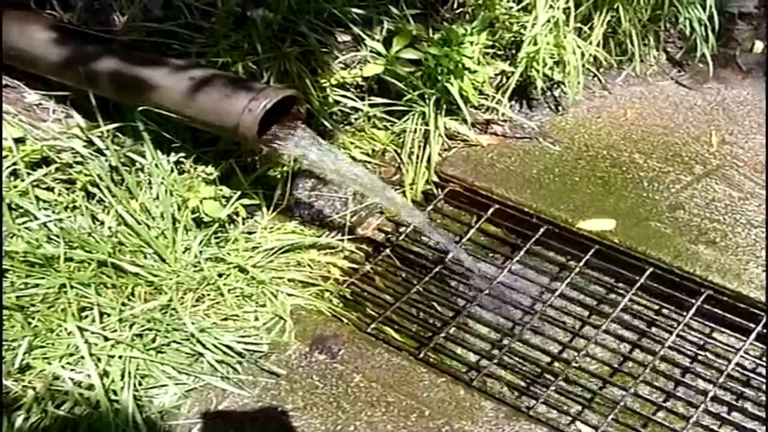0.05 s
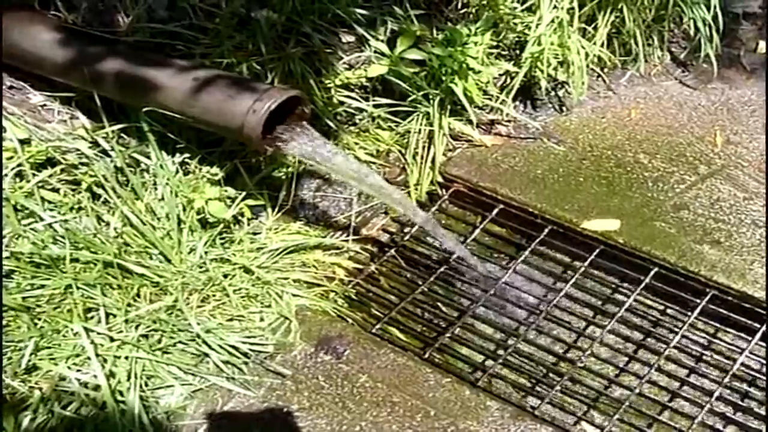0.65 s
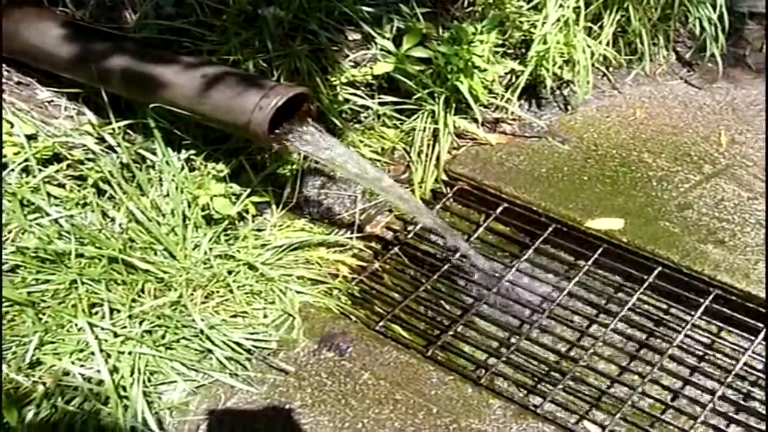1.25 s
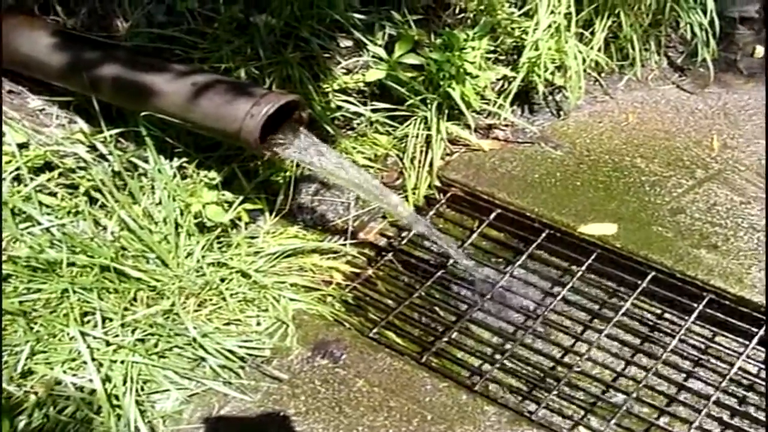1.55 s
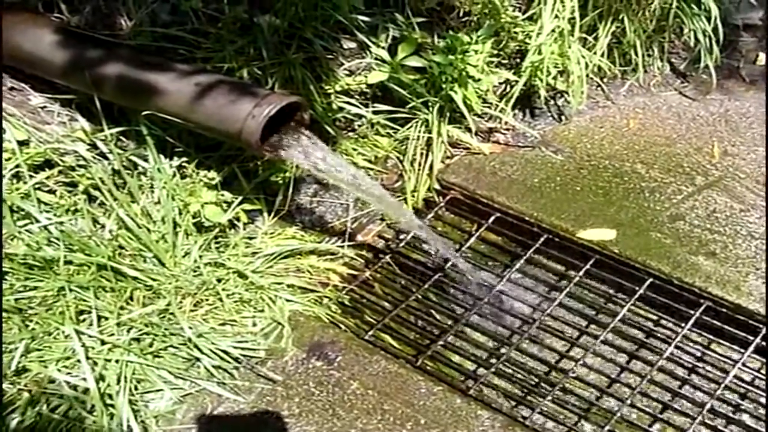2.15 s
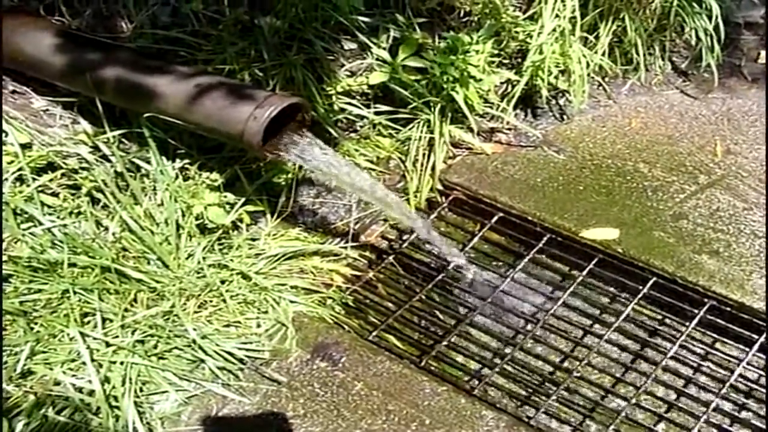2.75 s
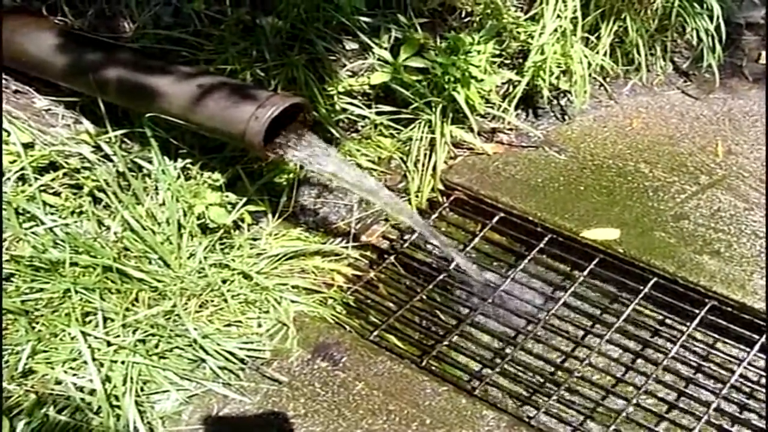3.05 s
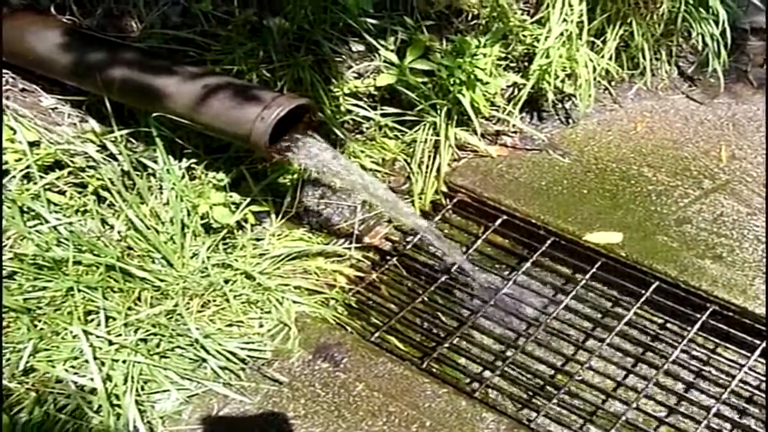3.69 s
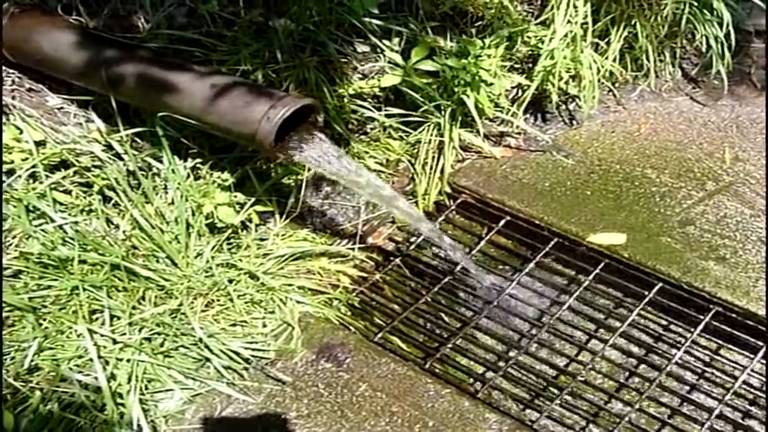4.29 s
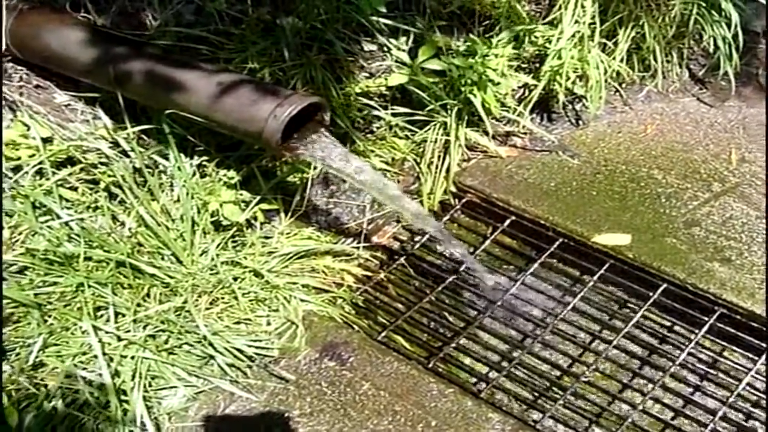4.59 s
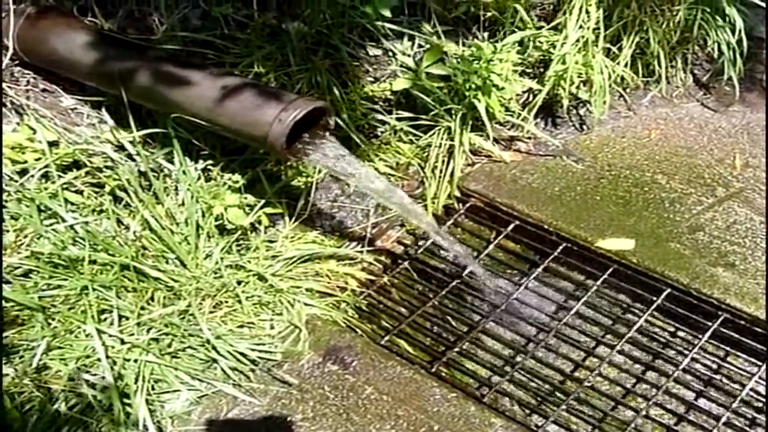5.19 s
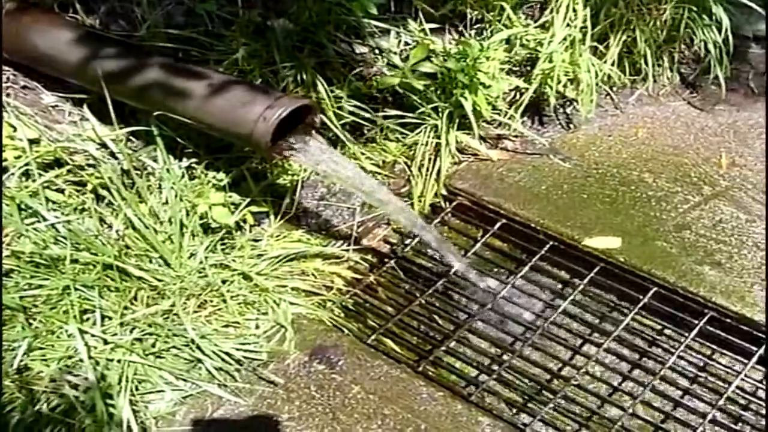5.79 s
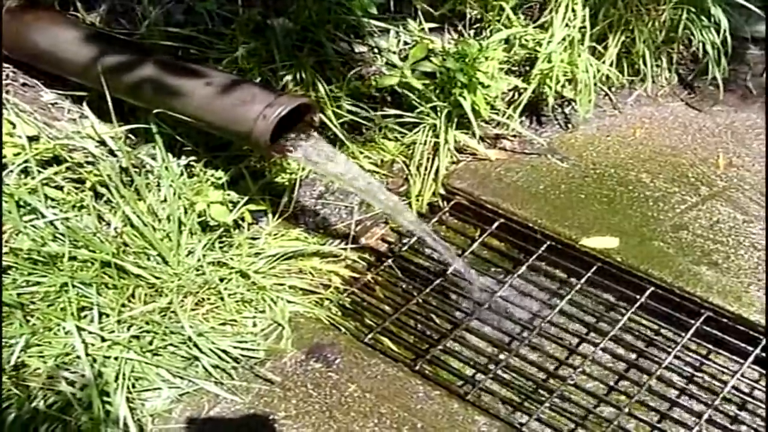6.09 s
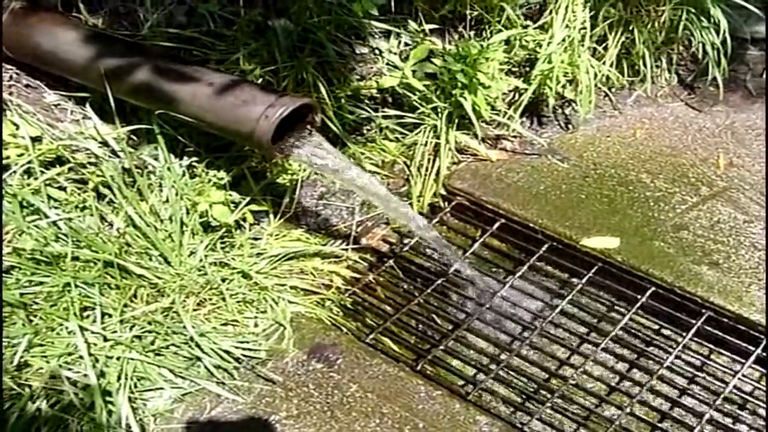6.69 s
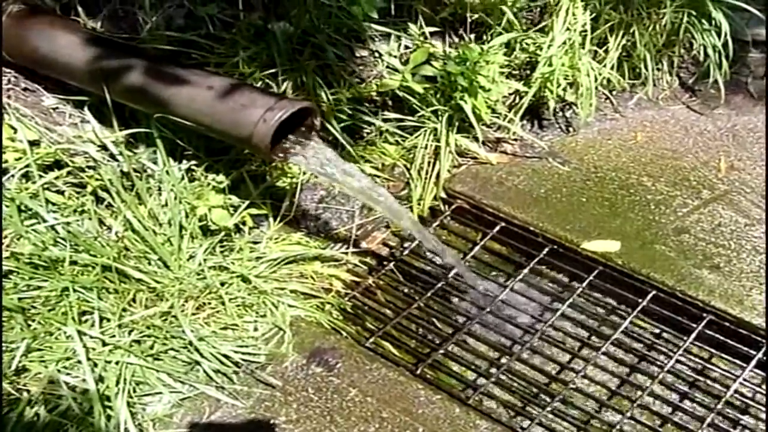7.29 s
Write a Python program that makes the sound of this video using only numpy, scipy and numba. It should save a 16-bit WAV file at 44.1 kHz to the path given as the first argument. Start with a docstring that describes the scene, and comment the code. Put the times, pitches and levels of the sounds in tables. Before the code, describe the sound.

Close up, a jet of water splashes steadily on a steel grate over a concrete drain, hissing and spattering, with fat drops ticking on the bars and light bubbling underneath. The water fills the foreground throughout in the open air. A distant car passes softly during the first half, a faint low hum and traffic rumble stay underneath, and a far engine drones quietly towards the end.

```python
"""At a steel grate over a concrete drain channel, a stereo pair close to where spring water lands.
The jet gushes from its pipe in surges: fine spray hisses, fat drops slap the bars, and bubbles of
trapped air ring in the channel below. On a distant road a car rolls by and its tyre roar fades;
a low hum stays over the traffic rumble, and a far engine drones towards the end."""
import sys
import numpy as np
from scipy import signal
from scipy.fft import rfft, irfft
from scipy.io import wavfile
from scipy.ndimage import uniform_filter1d
from numba import njit

SR = 44100
rng = np.random.default_rng(int(sys.argv[2]) if len(sys.argv) > 2 else 0)


def dump_mix(stems):
    """Bounce the given channels to the path in sys.argv[1] as a 16-bit WAV at rate SR."""
    frames = np.atleast_2d(stems).T  # one column per channel
    limited = np.clip(frames, -1, 1)  # hard clip at full scale
    pcm = np.round(limited * 32767).astype(np.int16)
    wavfile.write(sys.argv[1], SR, pcm)


N = 328104
TIME = np.arange(N) / SR
FREQS = np.fft.rfftfreq(N, 1 / SR) + 1e-3

# Levels in the tables are relative; each source sets its own gain.
# light air on the microphones: f/Hz, level/dB
BREEZE_COLOUR = [(20, -5), (50, 0), (90, -6), (200, -24), (800, -60)]
# far traffic: f/Hz, level/dB
TRAFFIC_COLOUR = [(20, -9), (38, -3), (55, -3), (65, -1.5), (85, -0.5), (130, 1), (250, 2.5), (400, -13),
                  (1000, -9), (2500, -52)]
# low hum in the distance: t/s, level/dB
HUM_LEVEL = [(0, -50.5), (.7, -44.5), (1.1, -47), (1.8, -42), (3, -43.5), (4.6, -51), (5.6, -44),
             (6.6, -48.5), (7.44, -49.5)]
# far engine: t/s, level/dB
ENGINE_LEVEL = [(0, -62), (3, -53.5), (4.4, -51), (5.6, -55.5), (6.6, -46), (7.44, -47.5)]
# tyres of the passing car: t/s, level/dB, centre f/Hz
TYRE_PASS = [(0, -32, 1150), (.7, -31, 1200), (1.3, -30.8, 1240), (1.8, -30.5, 1330), (2.3, -31.5, 1370),
             (2.8, -34.5, 1310), (3.3, -39.5, 1180), (3.8, -45.5, 1130), (4.5, -56.5, 1070),
             (7.44, -58, 1080)]
# low roar of the road: t/s, level/dB
ROAD_LEVEL = [(0, -38), (2, -40), (3.8, -41), (5, -44), (7.44, -47.5)]
# colour of that roar: f/Hz, level/dB
ROAD_COLOUR = [(60, -16), (150, -10), (240, -6), (285, 4), (330, .5), (500, -2), (700, -5.5),
               (900, -8), (2500, -23.5)]
# reflections in the channel: f/Hz, level/dB
CHANNEL_COLOUR = [(500, 6.5), (1700, 5), (2700, -8), (3400, 2), (4800, 3), (5600, -1), (6500, 4.5),
                  (9000, 4.5), (11500, 7.5), (15000, 7.5)]
# single bubbles under the grate: t/s, level/dB, f/Hz, ring length/cycles to 60 dB down
BIG_BUBBLES = [(.452, -17, 2780, 48), (.461, -15, 4130, 62), (.585, -17, 650, 10), (.614, -15, 2200, 15),
               (1.812, -15, 2840, 40), (2.184, -18, 2900, 45), (2.207, -15, 2730, 50),
               (3.057, -16.5, 2710, 47), (3.271, -15, 2500, 43), (3.416, -30, 287, 35),
               (3.617, -15, 2680, 49), (3.735, -30, 300, 20), (3.738, -25, 470, 15), (3.764, -31, 225, 29),
               (3.778, -30, 400, 39), (3.922, -18, 2860, 45), (4.055, -16, 2900, 45),
               (4.098, -16, 2840, 38), (4.333, -23.5, 1420, 44), (4.537, -14.5, 2780, 35),
               (4.57, -15, 2510, 31), (4.948, -27, 660, 16), (5.129, -14, 2750, 53), (5.788, -23, 620, 14),
               (6.262, -16, 2780, 70), (6.333, -17, 1600, 12), (6.772, -17, 2720, 51),
               (7.028, -25, 2020, 42), (7.252, -12, 2800, 58)]
# small bubbles, tiny bubbles, splatter and fine spray: f/Hz, level/dB
FIZZ_COLOUR = [(1000, -12), (2000, -6.5), (2850, 1), (3200, -1), (4500, -10)]
PING_COLOUR = [(3000, -2.5), (4700, 0), (5500, 3), (6300, -6.5), (7600, -1.5), (11000, -4)]
SPLATTER_COLOUR = [(1000, -21), (2000, -4.5), (3000, -1.5), (5200, 2), (6300, -2.5), (7700, -.5),
                   (11000, -8.5), (16000, -15)]
SPRAY_COLOUR = [(300, -9), (900, -12), (1700, -13), (2400, -7.5), (3500, -4), (4800, -1), (5600, 1),
                (6200, 0), (7600, 0.5), (8900, -0.5), (9700, 1), (11800, -2), (13400, -1), (15800, -5.5)]
# fat drops on the bars: t/s, level/dB, f/Hz
FAT_DROPS = [(0.1744, -7, 5470), (0.4285, -3, 4770), (.527, -2, 10100), (0.586, -5, 5900), (.616, -3, 6300),
             (.8306, -5, 6000), (0.8925, -1.5, 5940), (.958, -7, 6700), (0.9673, -6, 5800),
             (1.008, -6, 5400), (1.065, -7, 7700), (1.0995, -5, 5100), (1.2819, -5, 6650),
             (1.803, -3, 6700), (1.9624, -3, 9300), (2.1227, -10, 5600), (2.1862, -11, 3580),
             (2.5598, -5, 7400), (2.665, 0, 6600), (2.8022, -2, 8700), (3.127, -11, 4600),
             (3.3484, -3, 10200), (3.507, -6, 5300), (3.5544, -9, 5300), (3.571, -4, 5400),
             (3.7109, -8, 5000), (3.75, -3, 6330), (3.8689, -3, 6500), (3.949, -2.5, 5000),
             (3.9844, -5, 8000), (4.055, -10.5, 3500), (4.1515, 1.5, 7600), (4.2004, -3, 8700),
             (4.401, -8, 4580), (4.498, -5, 5500), (4.599, -1.5, 4520), (4.7357, -7, 7800),
             (4.7715, -4, 4320), (5.062, -6, 11000), (5.0673, -1, 8500), (5.124, -7, 5160),
             (5.418, -3, 6670), (5.5602, -1, 6400), (5.6348, -2, 9300), (5.651, -6, 6000),
             (5.7928, -3.5, 5240), (5.8434, -10, 6400), (5.953, -11, 6500), (6.1007, -2.5, 5340),
             (6.287, -6, 7100), (6.331, 4, 12800), (6.456, 1, 5560), (6.5028, -5, 7400), (6.561, -7, 4650),
             (6.7302, -2.5, 4360), (6.7431, -7, 4900), (6.827, -4.5, 5300), (6.8465, -6, 5300),
             (6.919, -8, 6100), (7.058, -11, 5100), (7.176, -4, 5670), (7.2534, -12, 3000),
             (7.3132, -7, 8400)]
# the stream builds up, then holds: t/s, level/dB
STREAM_FLOW = [(0, -3.5), (.3, -2), (.5, .2), (1.3, 0.7), (2.2, 0.3), (3, -0.9), (3.7, 0), (4.4, -0.5),
               (5.2, .5), (5.9, -1), (7.44, -0.6)]
# thick lumps of water landing on the grate: t/s, length/s, splash level/dB, bubbling level/dB
HEAVY_GUSHES = [(0.449, 0.045, -28, -33), (0.547, 0.042, -28, -41), (0.955, 0.053, -23, -38),
                (1.474, 0.033, -22, -43), (1.795, 0.029, -22, -32), (1.861, 0.081, -23.5, -27.5),
                (2.068, 0.051, -24, -42), (2.176, 0.032, -29, -31), (2.278, 0.08, -26, -33),
                (2.746, 0.044, -23, -32), (2.955, 0.041, -23, -40), (3.546, 0.035, -22, -43),
                (3.979, 0.056, -24, -39), (4.09, 0.044, -19, -32), (4.142, 0.037, -20, -42),
                (4.374, 0.057, -25, -35), (4.561, 0.044, -25, -30), (4.687, 0.03, -18.5, -39),
                (4.729, 0.051, -25, -34), (5.154, 0.03, -20.5, -37), (5.218, 0.037, -22, -30),
                (5.383, 0.03, -26, -42), (5.629, 0.024, -34, -49), (5.822, 0.044, -22, -30),
                (6.076, 0.044, -27, -40), (6.25, 0.063, -22, -32), (6.574, 0.081, -23, -43),
                (6.72, 0.044, -22, -32), (6.768, 0.038, -20, -40), (6.817, 0.033, -26, -42),
                (6.888, 0.034, -29, -49), (7.023, 0.069, -22.5, -31), (7.098, 0.025, -21.5, -35),
                (7.155, 0.022, -19.5, -45), (7.246, 0.042, -29, -37), (7.341, 0.076, -20, -49)]
# the water, left microphone minus right: f/Hz, level/dB
MIC_BALANCE = [(300, 0), (1000, 0), (1600, -1), (2700, -0.2), (3400, -0.8), (4500, -1), (5500, 0),
               (8000, -1), (9800, -1.5), (12500, .7), (15500, 0)]

GUSH_ATTACK_S, GUSH_RELEASE_S = .0049, .0065


def undb(db):
    """Decibels to gain."""
    return 10 ** (np.asarray(db) / 20)


def unit(x):
    """Scale to rms 1."""
    return x / np.sqrt(np.mean(x ** 2))


def curves(table):
    """Each column after t/s as a value per sample."""
    s, *columns = np.transpose(table)
    return [np.interp(TIME, s, c) for c in columns]


def colour(x, points):
    """Filter by a spectrum of f/Hz, level/dB points."""
    hz, db = np.transpose(points)
    return irfft(rfft(x) * undb(np.interp(np.log(FREQS), np.log(hz), db)), N)


def walk(rate_hz):
    """Smooth random drift of rms 1, rolled off above rate_hz."""
    return unit(irfft(rfft(rng.standard_normal(N)) / (1 + (FREQS / rate_hz) ** 4), N))


def air_noise(side_db):
    """Stereo noise, mostly alike at both microphones."""
    mid, side = rng.standard_normal((2, N))
    return mid + undb(side_db) * np.array([side, -side])


def band(x, hz, width_hz):
    """A resonance with steep skirts."""
    detune = (FREQS ** 2 - hz ** 2) / (FREQS * width_hz)
    return irfft(rfft(x) / (1 + detune ** 2), N)


@njit
def damped_sines(start, size, hz, cycles, glide, pan, lag_s):
    """Sines that swell within a cycle and rise in pitch as they die, each from its own direction."""
    out = np.zeros((2, N))
    for k in range(len(start)):
        life = cycles[k] / hz[k]
        for mic in range(2):
            sign = 1 - 2 * mic
            onset = start[k] - sign * lag_s[k] / 2
            gain = size[k] * (1 + sign * pan[k])
            for i in range(max(int(onset * SR) + 1, 0), min(int((onset + life) * SR), N)):
                age = (i / SR - onset) / life
                turns = cycles[k] * age * (1 + glide[k] * age / 2)
                out[mic, i] += gain * min(turns, 1.) * np.exp(-6.9 * age) * np.sin(2 * np.pi * turns)
    return out


def ring(start, size, hz, cycles, glide, pan=0, lag_s=0):
    """One damped sine per start time; a single number applies to them all."""
    settings = start, size, hz, cycles, glide, pan, lag_s
    return damped_sines(*[x * np.ones(len(start)) for x in settings])


def shower(count, low_hz, high_hz, cycles, scatter_db, glide, spread, lag_ms):
    """A cloud of water grains, many small and a few large, round the point of impact; rms 1."""
    when, pitch, rank, length, side, lead, sign = rng.random((count, 7)).T
    hz = low_hz * (high_hz / low_hz) ** pitch
    weight = -np.log(1 - rank * (1 - np.exp(-4)))  # exponential spread, ending at 4
    size = undb(scatter_db * weight) * hz * np.sign(sign - .5)  # short high grains stand taller
    grain_cycles = cycles * 2 ** (2 * length - 1)
    pan, lag_s = spread * (2 * side - 1), lag_ms * (2 * lead - 1) / 1000
    return unit(ring(when * N / SR, size, hz, grain_cycles, glide, pan, lag_s))


def spurts(count, fade_s, depth, rise_s=.0022):
    """Envelope of lumps of water hitting at random, each rising fast and dying away; mean 1."""
    when, size = rng.random((count, 2)).T
    hits = np.bincount((when * N).astype(int), size ** 2, N)
    lumps = signal.lfilter([1], [1, -np.exp(-1 / (fade_s * SR))], hits)
    gain = 1 + depth * uniform_filter1d(np.sqrt(lumps), int(rise_s * SR) + 1)
    return gain / np.mean(gain)


def puffs(brightness, fade_s=.0039):
    """Envelope of the droplets each fat drop throws up; positive brightness favours sharp slaps."""
    s, db, hz = np.transpose(FAT_DROPS)
    hits = np.bincount((s * SR).astype(int), undb(db) * (hz / np.median(hz)) ** brightness, N)
    return signal.lfilter([1], [1, -np.exp(-1 / (fade_s * SR))], hits)


def bursts(start_s, length_s, db):
    """Envelope of timed lumps of water: each swells quickly, holds and dies away."""
    gain = np.zeros(N)
    for s, length, size in zip(start_s, length_s, undb(db)):
        near = slice(*np.searchsorted(TIME, [s, s + length + 10 * GUSH_RELEASE_S]))
        age = TIME[near] - s
        attack = np.minimum(age / GUSH_ATTACK_S, 1)
        gain[near] += size * attack * np.exp(-np.maximum(age - length, 0) / GUSH_RELEASE_S)
    return gain


def breeze(level_db=-66):
    """Light air rumbles on each microphone port separately."""
    return unit(colour(rng.standard_normal((2, N)), BREEZE_COLOUR)) * undb(level_db)


def hum(hz=192.4):
    """A low tone in the distance wavers in pitch and level."""
    waver_hz, waver_db = 2 * walk(8), 1.4 * walk(9)
    tone = np.sqrt(2) * np.sin(2 * np.pi * np.cumsum(hz + waver_hz) / SR)
    return tone * undb(curves(HUM_LEVEL)[0] + waver_db + .2)


def traffic(level_db=-45):
    """Far traffic rumbles and swells a little."""
    swell_db = .5 * walk(2)
    return unit(colour(air_noise(-13.5), TRAFFIC_COLOUR)) * undb(level_db + swell_db)


def engine():
    """A far engine drones roughly in one narrow low band."""
    drone = unit(band(air_noise(-22), hz=96.5, width_hz=18))
    return drone * undb(curves(ENGINE_LEVEL)[0] - 1.5)


def car():
    """On the distant road, tyre treads roar in a band that shifts as the car goes by."""
    db, centre_hz = curves(TYRE_PASS)
    tread = 0
    for hz in 900 * 2 ** (np.arange(9) / 6):
        weight = np.exp(-(np.log2(hz / centre_hz) / .6) ** 2) / np.sqrt(hz)
        tread += band(air_noise(-17), hz, hz / 6) * weight
    tyres = unit(tread) * undb(db) * undb([[-1], [.9]])  # a little to the right
    road = unit(colour(air_noise(-20), ROAD_COLOUR)) * undb(curves(ROAD_LEVEL)[0] - 2)
    return tyres + road


def channel(water, t60_s=.045, echo_gain_db=-10, paths=5):
    """The concrete channel gives each splash a brief tail; the paths change as the water moves."""
    t = np.arange(SR // 16) / SR
    echo = 0
    for _ in range(paths):
        tails = rng.standard_normal((2, len(t))) * undb(-60 * t / t60_s)
        tails /= np.sqrt(paths * np.sum(tails ** 2, axis=1, keepdims=True))
        shifting = np.sqrt(2) * np.sin(2 * walk(11))
        echo += shifting * signal.fftconvolve(water, tails, axes=1)[:, :N]
    return water + undb(echo_gain_db) * colour(echo, CHANNEL_COLOUR)


def gurgle(level_db=-44.5):
    """Larger bubbles burble faintly and evenly in the run-off, wide across the pair."""
    large = shower(count=4500, low_hz=310.5, high_hz=2140, cycles=14,
                   scatter_db=3.5, glide=.16, spread=.82, lag_ms=.088)
    return large * undb(level_db)


def trapped_air(surge_db, gulp_hz=17, gulp_db=4, swarm_s=.025):
    """Gain of the fizz: random gulps, the air under each gush and a swarm round each big bubble."""
    s, length, _, air_db = np.transpose(HEAVY_GUSHES)
    plop_s, plop_db, _, _ = np.transpose(BIG_BUBBLES)
    gulps = undb(-42.5 + gulp_db * walk(gulp_hz) + .37 * surge_db)  # a surge drags more air under
    gushes = bursts(s, length, air_db - 5)
    swarms = bursts(plop_s - GUSH_ATTACK_S, np.full(len(plop_s), swarm_s), plop_db - 24)
    return np.sqrt(gulps ** 2 + gushes ** 2 + swarms ** 2)


def fizz(air):
    """Air dragged under the surface rings as small rising bubbles."""
    small = shower(count=2600, low_hz=2193, high_hz=4050, cycles=44,
                   scatter_db=1.5, glide=.31, spread=.057, lag_ms=.0067)
    return unit(colour(small, FIZZ_COLOUR)) * air


def plops():
    """Single big bubbles ring under the grate and rise in pitch as they near the surface."""
    s, db, hz, cycles = np.transpose(BIG_BUBBLES)
    return ring(s, undb(db), hz, cycles, glide=.13)


def pings(surge_db):
    """Tiny bubbles trapped by the drops ring for a few milliseconds."""
    tiny = shower(count=3600, low_hz=3665, high_hz=10820, cycles=85,
                  scatter_db=3, glide=.314, spread=.17, lag_ms=.0092)
    return unit(colour(tiny, PING_COLOUR)) * undb(-34.5 + 1.6 * surge_db)


def drops(cycles=10.3, breakup_s=.0012, fragments=4):
    """Close up, each fat drop slaps a bar with a dull tap, traps a bubble and scatters fragments."""
    s, db, hz = np.transpose(FAT_DROPS)
    slap = ring(s, undb(db), hz, cycles, glide=.061)
    tap = ring(s, undb(db - 17), hz=2200, cycles=7.6, glide=.1)
    bubble = ring(s + breakup_s, undb(db - 12), hz, cycles=47, glide=.09)
    patter = 0
    for k in range(fragments):
        side, late, detune = rng.random((len(s), 3)).T
        start = s + breakup_s * (k + 1 + late) / 2
        fragment_hz = hz * 1.3 ** (2 * detune - 1)
        patter += ring(start, undb(db - 4 - 2 * k), fragment_hz, cycles, glide=.066, pan=.3 * (side - .5))
    return slap + tap + bubble + patter


def splatter(surge_db):
    """Drops burst on the bars in quick clusters, a few cycles each."""
    slaps = shower(count=13000, low_hz=1970, high_hz=10500, cycles=8.4,
                   scatter_db=2.5, glide=.083, spread=.062, lag_ms=.0051)
    clusters = undb(1.3 * surge_db) * spurts(count=330, fade_s=.008, depth=4)
    clusters += 2.3 * puffs(brightness=-.9)
    return unit(colour(slaps, SPLATTER_COLOUR)) * undb(-33.5) * clusters


def spray(surge_db):
    """Thousands of tiny droplets hiss close to the microphones; the mist smooths out the surges."""
    mist = shower(count=190000, low_hz=510, high_hz=17050, cycles=5.7,
                  scatter_db=2, glide=.093, spread=.061, lag_ms=.0033)
    swell = undb(.5 * surge_db) * spurts(count=700, fade_s=.007, depth=.55)
    swell += .75 * puffs(brightness=.6)
    return unit(colour(mist, SPRAY_COLOUR)) * undb(-27.5) * swell


def jet(bead_hz=12.7, bead_drift_hz=.9, bead_db=.75, wobble_hz=27, wobble_db=.7, stream_db=-20.5):
    """Jet strength in dB about its mean: it sheds beads almost regularly, wobbles and gushes."""
    s, length, splash_db, _ = np.transpose(HEAVY_GUSHES)
    beads = np.sin(2 * np.pi * np.cumsum(bead_hz + bead_drift_hz * walk(3.4)) / SR)
    stream = undb(curves(STREAM_FLOW)[0] + bead_db * beads + wobble_db * walk(wobble_hz))
    gushes = bursts(s, length, splash_db - stream_db)  # relative to the plain stream
    surge_db = 20 * np.log10(np.hypot(stream, gushes))
    return surge_db - np.mean(surge_db)


def scene():
    """The surging water right in front of the pair, the road far behind it."""
    surge_db = jet()
    water = spray(surge_db) + splatter(surge_db) + pings(surge_db) + fizz(trapped_air(surge_db))
    water = channel(water + gurgle() + drops() + plops())
    left = colour(water[0], [(hz, db / 2) for hz, db in MIC_BALANCE])
    right = colour(water[1], [(hz, -db / 2) for hz, db in MIC_BALANCE])
    return np.array([left, right]) + car() + hum() + traffic() + engine() + breeze()


def record(dry, bass_hz=28, top_hz=15850):
    """The recorder thins the deepest bass and cuts the top."""
    bass_cut = signal.butter(2, bass_hz, "high", fs=SR, output="sos")
    top_cut = signal.ellip(10, .2, 80, top_hz, fs=SR, output="sos")
    return signal.sosfilt(top_cut, signal.sosfilt(bass_cut, dry))


dry = scene()
out = record(dry)
dump_mix(out)
```